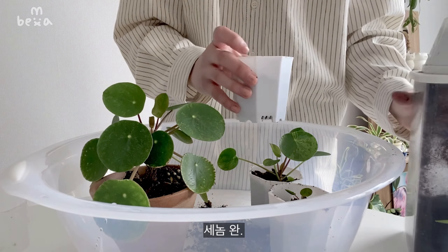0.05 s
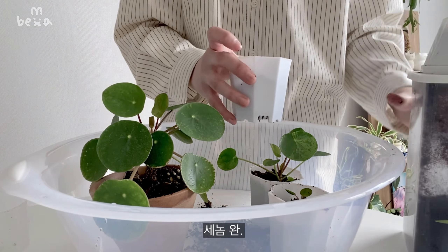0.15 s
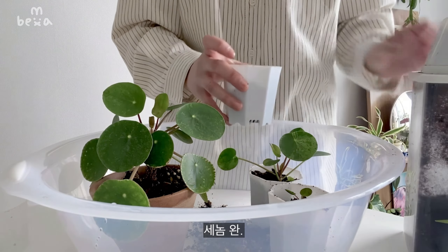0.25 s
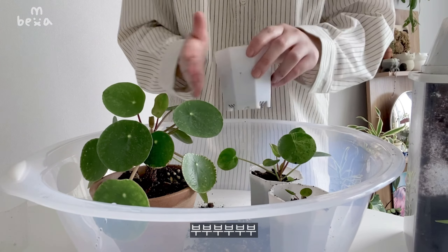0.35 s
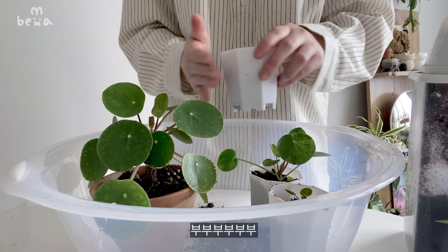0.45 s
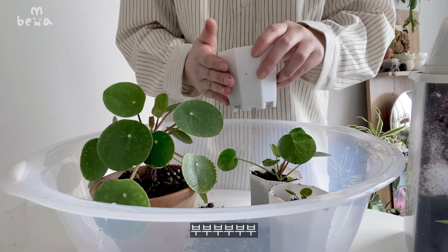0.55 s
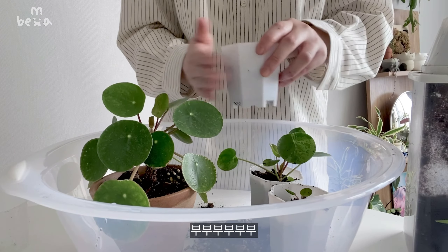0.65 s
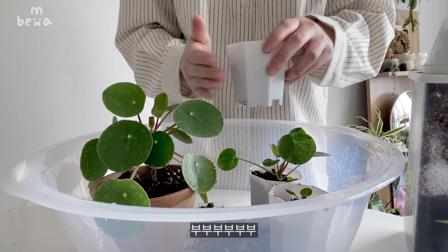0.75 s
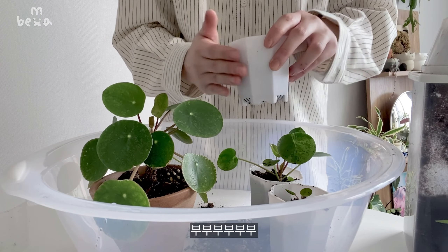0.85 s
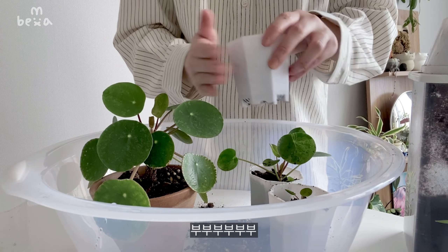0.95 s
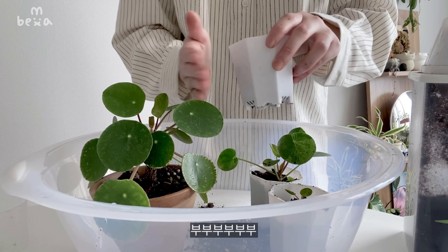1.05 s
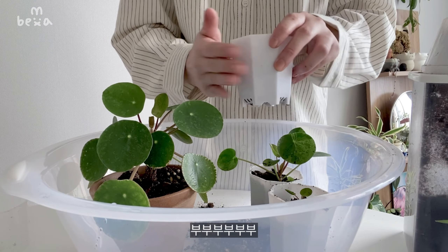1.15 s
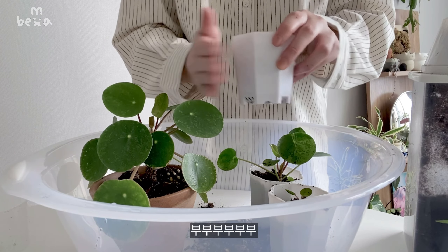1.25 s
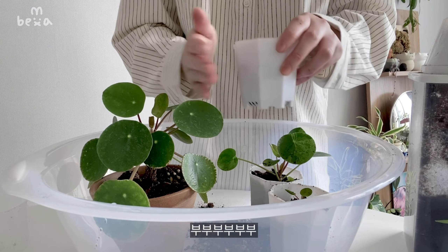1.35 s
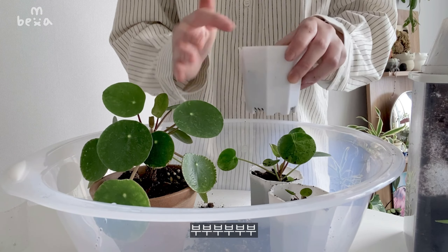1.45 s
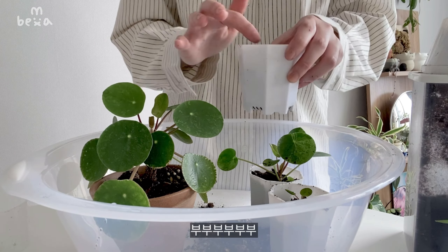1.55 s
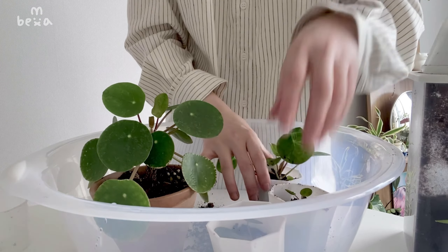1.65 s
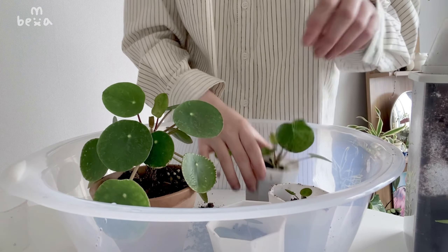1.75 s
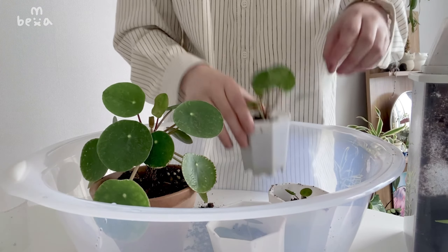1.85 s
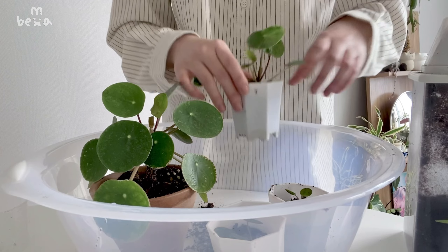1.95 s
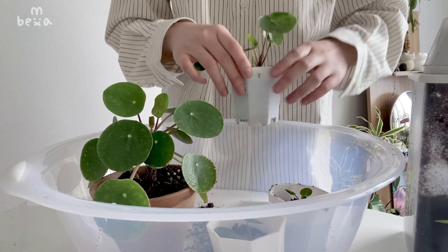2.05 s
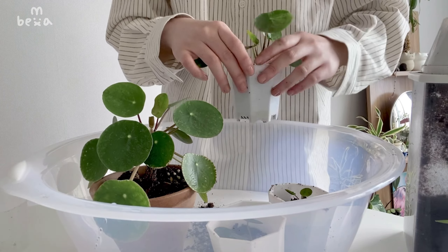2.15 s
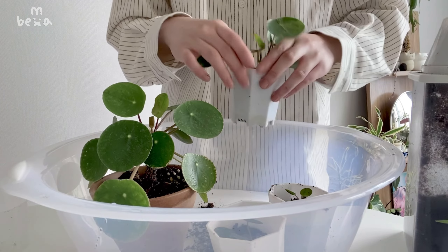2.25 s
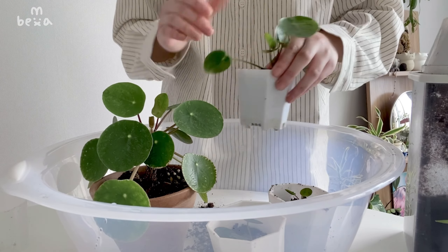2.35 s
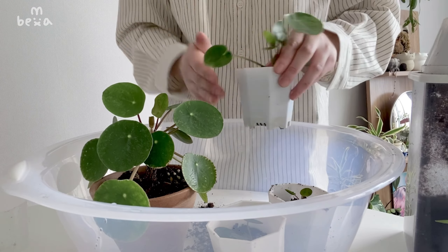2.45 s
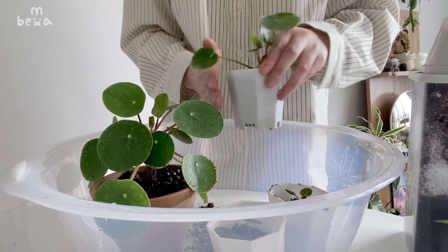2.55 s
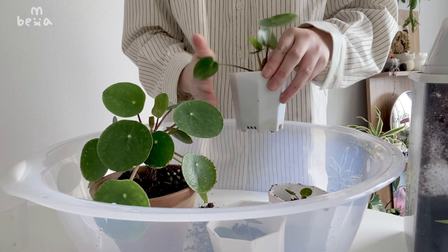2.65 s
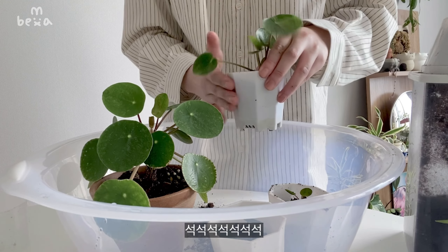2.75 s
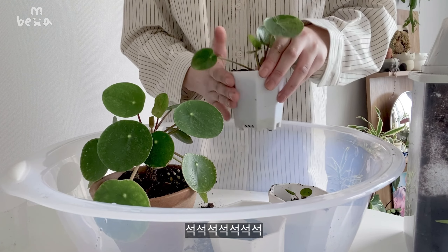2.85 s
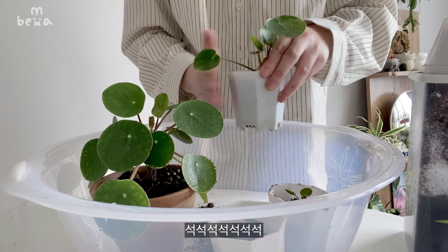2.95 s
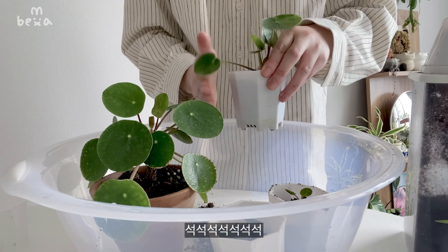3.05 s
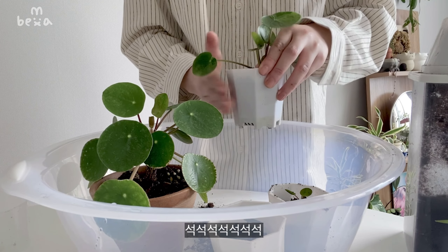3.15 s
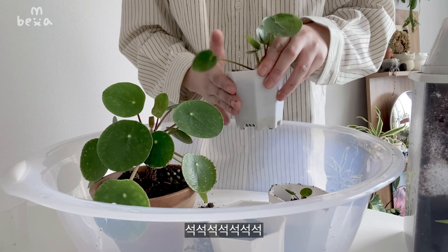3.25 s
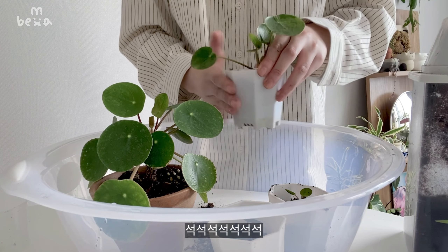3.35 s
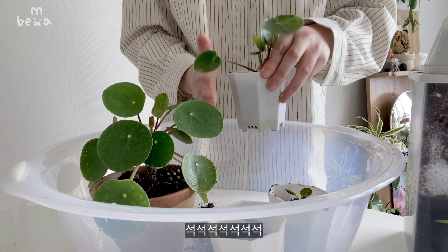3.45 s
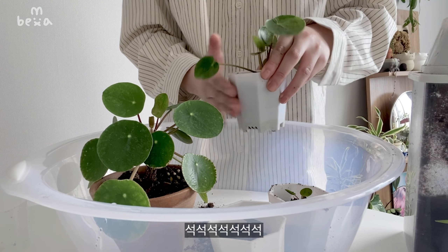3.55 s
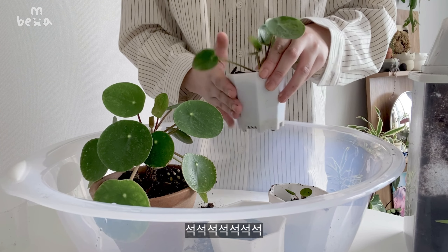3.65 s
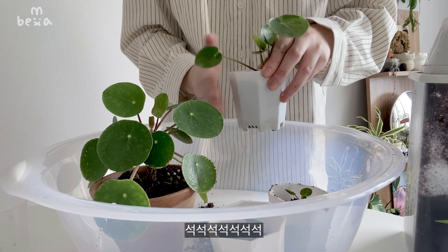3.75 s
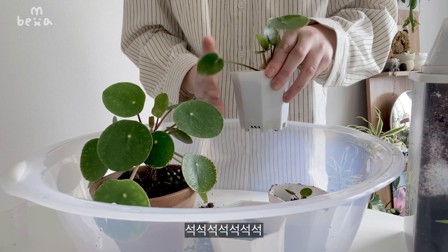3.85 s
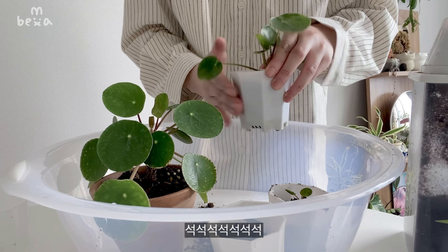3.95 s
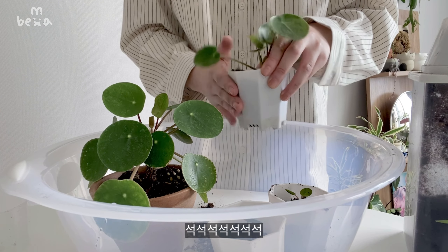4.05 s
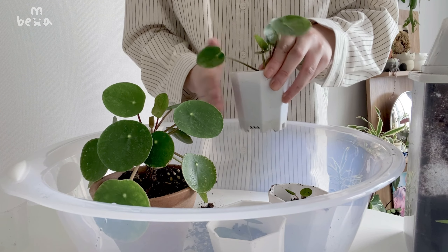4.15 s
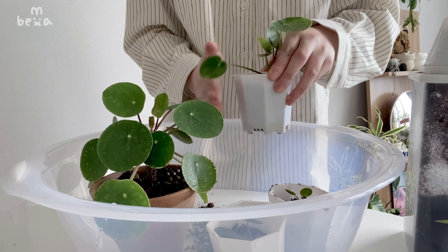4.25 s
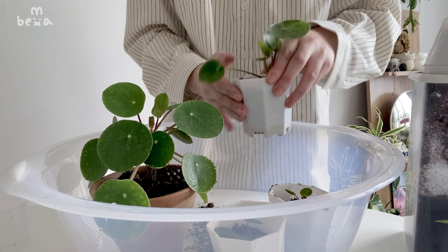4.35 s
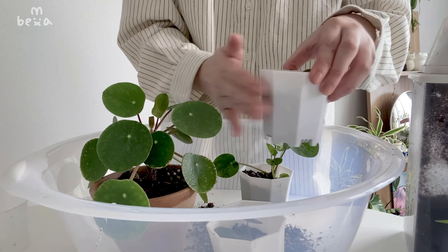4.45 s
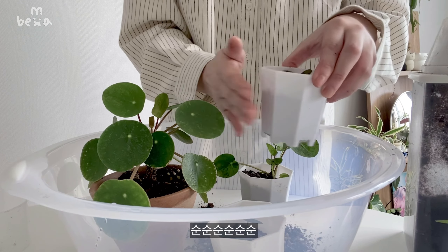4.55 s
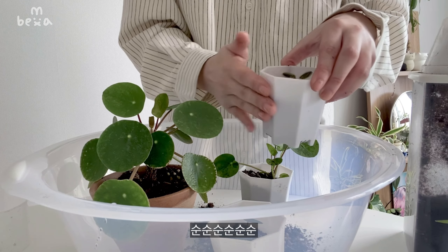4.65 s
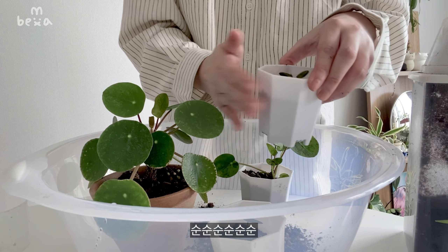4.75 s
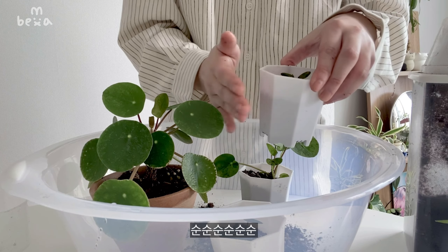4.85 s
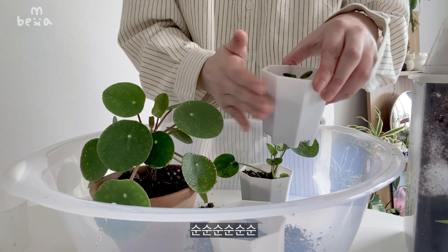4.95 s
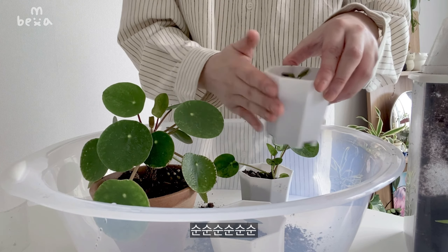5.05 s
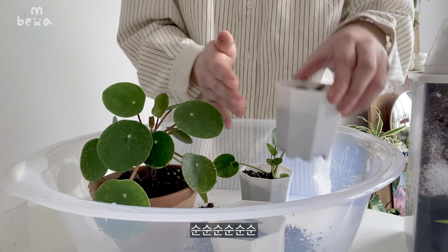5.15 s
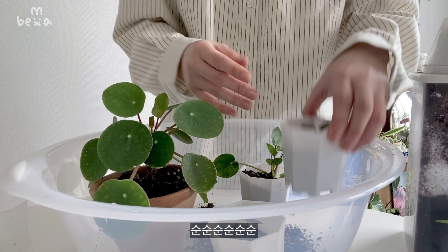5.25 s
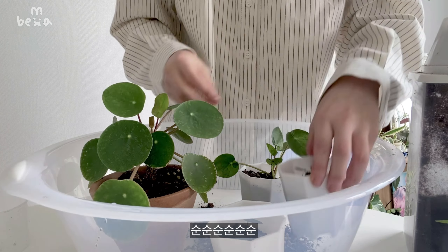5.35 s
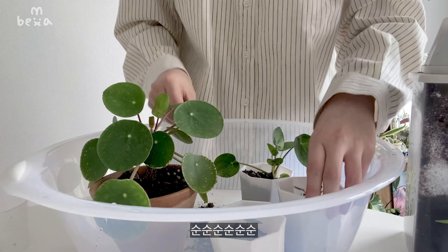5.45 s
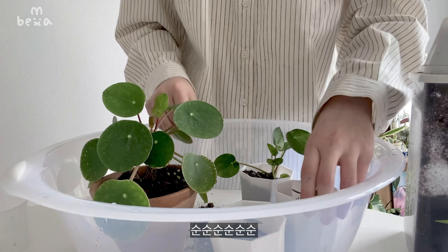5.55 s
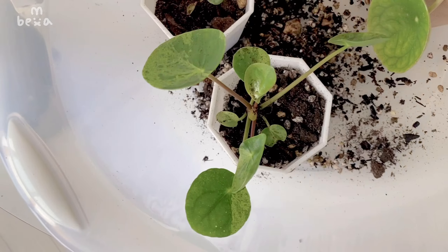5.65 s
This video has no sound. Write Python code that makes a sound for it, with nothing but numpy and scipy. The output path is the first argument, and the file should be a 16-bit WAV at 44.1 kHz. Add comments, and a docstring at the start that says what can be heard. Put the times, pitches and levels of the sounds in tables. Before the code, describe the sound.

Quick, crackly hand pats on thin plastic plant pots, with dry soil rustling inside, between a few hollow knocks in a small room.

```python
"""A palm pats three small plastic plant pots in turn, about seven times a second, to settle dry soil.
Each pat crackles on the thin wall, knocks on the air inside, thumps the filling and shakes loose crumbs.
First come hollow plastic knocks and a short scrape as something is set down; at the end the last pot
lands in a big plastic tub. The small room echoes and has a low hum.
A faint tone wavers near 1.9 kHz, and four times the sound drops out briefly."""
import sys
import numpy as np
from scipy import signal
from scipy.fft import rfft, irfft, next_fast_len
from scipy.io import wavfile
from scipy.ndimage import uniform_filter1d

SR = 44100
rng = np.random.default_rng(int(sys.argv[2]) if len(sys.argv) > 2 else 0)


def store_pcm(level_fs):
    """Save levels as 16-bit WAV."""
    pcm = np.round(np.clip(level_fs, -1, 1) * 32767).astype(np.int16)
    wavfile.write(sys.argv[1], SR, np.atleast_2d(pcm).T)


N = 250558
TIME = np.arange(N) / SR


def gain(db):
    """Turn decibels into a number to multiply by."""
    return 10 ** (np.asarray(db) / 20)


def normalise(x):
    """Scale a sound so its average strength (rms) is 1."""
    return x / np.sqrt(np.mean(x ** 2))


def lookup(hz, points):
    """Read between (pitch_hz, value) points, with octaves evenly spaced."""
    pitches, values = np.transpose(points)
    return np.interp(np.log(hz + 1), np.log(pitches), values)


def colour(x, points):
    """Turn the lows and highs of a sound up or down along (pitch_hz, level_db) points."""
    size = x.shape[-1]
    padded = next_fast_len(size + size // 20, True)
    gains = gain(lookup(np.fft.rfftfreq(padded, 1 / SR), points))
    return irfft(rfft(x, padded) * gains, padded)[..., :size]


def add(track, start_s, sound):
    """Mix a sound into a track at a given time."""
    i = max(int(start_s * SR), 0)
    track[..., i:i + sound.shape[-1]] += sound[..., :N - i]


def convolve(x, response):
    """Make a sound ring or echo the way `response` does after a click."""
    return signal.fftconvolve(np.atleast_2d(x), np.atleast_2d(response), axes=1)[:, :N]


def stereo(x, left_lead_s, left_louder_db):
    """Place a sound: it is earlier and louder on the left; negative values favour the right."""
    ahead = np.clip(np.arange(N) + round(left_lead_s * SR), 0, N - 1)
    return np.array([x[ahead] * gain(left_louder_db / 2), x * gain(-left_louder_db / 2)])


def grains(size, spread_db):
    """A stream of tiny clicks; more spread makes a few stand out more."""
    strength = np.minimum(rng.exponential(size=size), 5)
    return normalise(rng.standard_normal(size) * gain(spread_db * strength))


def wander(rate_hz):
    """A random drift of about 1 either way that picks a new target at the given rate."""
    step = int(SR / rate_hz)
    targets = np.repeat(rng.standard_normal(N // step + 1), step)
    return normalise(uniform_filter1d(targets, step)[:N])


def ring(tones, pitch_factor=1, size=8192):
    """The fading tones an object gives after a click; a wider tone dies sooner."""
    t, sound = TIME[:size], np.zeros(size)
    for k, (hz, width_hz, db) in enumerate(tones):
        fade = gain(db) * width_hz * np.exp(-np.pi * width_hz * t)
        sound += (-1) ** k * fade * np.sin(2 * np.pi * hz * pitch_factor * t)
    return sound / np.linalg.norm(sound)


def burst(response, contact_s, spread_db, size=2048):
    """One touch is many tiny contacts, and each sets the plastic ringing."""
    age = TIME[:size] / max(contact_s, 1e-4)
    press = age ** 1.28 * np.exp(-1.15 * age)  # the contact grows, then settles
    sound = signal.fftconvolve(grains(size, spread_db) * press, response[:size])[:size]
    return sound / np.linalg.norm(sound)


def blows(rows, tones, size=8192):
    """Short, smooth pushes on something that rings; a longer push sounds duller."""
    track, response = np.zeros(N), ring(tones)
    for start_s, db, push_s in rows:
        push = np.sin(np.pi * np.minimum(TIME[:size] / push_s, 1))
        knock = signal.fftconvolve(push, response)[:size]
        add(track, start_s, gain(db) * knock / np.abs(knock).max())
    return track


# Hollow plastic knocks: start_s, level_db, push_s
PLASTIC_KNOCKS = [(0.0005, -29.5, 0.002), (0.017, -49.5, 0.0033), (0.046, -37.5, 0.0044),
                  (0.1185, -24.5, 0.0012), (0.1235, -29, 0.0066), (0.1302, -18.5, 0.00027),
                  (0.1365, -27, 0.00057), (0.159, -36.5, 0.00028), (0.193, -37, 0.00087),
                  (0.297, -47, 0.0014)]
# Tones of the hollow plastic: pitch_hz, width_hz, level_db
PLASTIC_TONES = [(117, 26.5, -5), (198, 47, 0.5), (324, 65, -0.5), (388, 54, 3), (590, 41, 1.5),
                 (647, 84, -1.5), (804, 207, 0), (902, 120, -3.5), (1120, 120, -10), (1500, 520, -26)]
# How the short scrape rises and falls: time_s, level_db
SCRAPE_LEVELS = [(0.0, -22.5), (0.106, -46), (0.12, -34.5), (0.134, -33), (0.168, -61), (0.25, -49),
                 (0.314, -91.5), (0.35, -72)]
def knocks_and_scrape():
    """Hollow plastic rings with a few knocks and a short scrape as something is set down."""
    scrape_db = np.interp(TIME, *np.transpose(SCRAPE_LEVELS))
    friction = grains(N, 2.7) * gain(scrape_db) * (TIME < SCRAPE_LEVELS[-1][0])
    rasp = colour(friction, [(20, -22.5), (60, -14.5), (120, -5.5), (300, 3.5), (900, -8),
                             (1500, -6.5), (2600, -23.5), (4000, -37.5), (12000, -51)])
    scrape = gain(-15.5) * convolve(friction, ring(PLASTIC_TONES))[0] + gain(5) * rasp
    return stereo(blows(PLASTIC_KNOCKS, PLASTIC_TONES) + scrape, -0.00027, 4.5)


# Time the echo takes to fade by 60 dB: pitch_hz, fade_s
ECHO_FADES = [(100, 0.5), (400, 0.6), (1200, 0.5), (3000, 0.55), (7000, 0.33), (14000, 0.67)]
# Lows and highs of the echo: pitch_hz, level_db
ECHO_COLOUR = [(60, 8), (300, -0.5), (700, -3), (1300, -4), (2800, -2.5), (5000, -8), (9000, -4.5),
               (10500, -21.5), (13000, -9.5), (16000, -18.5)]
def room_echo(size=32768):
    """A small room's answer to a click: many reflections, each pitch range fading at its own speed."""
    t, hz = TIME[:size], np.fft.rfftfreq(size, 1 / SR)
    noise = rfft(rng.standard_normal((2, size)))
    alike = 1 / (1 + (hz / 330) ** 2)  # long waves reach left and right alike
    noise[1] = alike * noise[0] + np.sqrt(1 - alike ** 2) * noise[1]
    echo = 0
    for centre_hz, fade_s in ECHO_FADES:
        band = lookup(hz, [(f, float(f == centre_hz)) for f, _ in ECHO_FADES])
        echo = echo + irfft(noise * band) * np.exp(-np.log(1000) * t / fade_s)
    early_boost = 1 + 1.4 * np.exp(-t / 0.025)
    onset = np.clip(t / 0.00087 - 0.5, 0, 1)
    return colour(echo / np.linalg.norm(echo[0]), ECHO_COLOUR) * early_boost * onset


# Lows and highs of the room's air noise: pitch_hz, level_db
AIR_COLOUR = [(20, -27.5), (45, -12.5), (68, -2), (90, -8), (120, -20), (200, -17.5), (400, -30),
              (850, -26), (1400, -37.5), (1800, -37.5), (2300, -46.5), (5000, -51.5), (15000, -60.5)]
def room_tone():
    """Dull air noise and a wavering low hum."""
    middle, side = (normalise(colour(rng.standard_normal(N), AIR_COLOUR)) for _ in range(2))
    side = colour(side, [(70, -8), (250, -4.5), (700, 3.5), (3000, 0)])
    air = np.array([middle + side, middle - side]) * gain(-67.5 + 1.1 * wander(8))
    hum_hz = 71.2 + 6 * wander(9)
    hum = np.sin(2 * np.pi * np.cumsum(hum_hz) / SR) * gain(-61.5 + 3 * wander(8.7))
    return air + stereo(hum, 0, 4.6)


def faint_tone():
    """A faint tone near 1.9 kHz wavers in pitch and level."""
    pitch_hz = 1868 + 18 * wander(60)
    tone = np.sin(2 * np.pi * np.cumsum(pitch_hz) / SR) * gain(-94 + 6 * wander(25))
    return stereo(tone, 0, 4.6)


# Fingers shifting their grip: peak_s, level_db
FINGER_RUBS = [(0.28, -72.5), (0.463, -63), (0.505, -72), (0.575, -69.5), (0.64, -54), (0.79, -58),
               (0.918, -57), (1.058, -50), (1.36, -51), (1.82, -74.5), (2.199, -78.5), (2.3, -77),
               (2.63, -62.5), (5.24, -76.5)]
# Crumbs and fingertips ticking on the wall: start_s, level_db
WALL_TICKS = [(0.493, -44), (0.6311, -44), (0.636, -31.5), (0.6518, -41.5), (1.061, -32.5), (1.0886, -31.5),
              (1.352, -38), (1.3618, -31.5), (2.6217, -39), (2.6646, -44), (4.5586, -46), (4.6071, -46.5),
              (5.266, -54)]
# Lows and highs of loose soil, also used for rubs and ticks: pitch_hz, level_db
SOIL_COLOUR = [(200, -29), (700, -9.5), (1800, -6), (3000, 2.5), (4500, 1.5), (8500, -5), (10500, -12),
               (13000, -8), (16000, -26)]
def fingers(rise_db_per_s=599.5, fall_db_per_s=451):
    """Skin creeps over the pot, and single crumbs and fingertips tick against it."""
    ticks, grip = np.zeros((2, N))
    for start_s, db in WALL_TICKS:
        add(ticks, start_s, gain(db + 12.5) * burst(np.ones(1), contact_s=0.00057, spread_db=12))
    for peak_s, db in FINGER_RUBS:
        swell_db = np.minimum(rise_db_per_s * (TIME - peak_s), fall_db_per_s * (peak_s - TIME))
        grip += gain(db + swell_db)
    rub = grains(N, 4.4) * grip * gain(wander(70))
    return stereo(gain(2) * colour(ticks + rub, SOIL_COLOUR), 0.00014, 0.5)


# Main tones of the thin pot wall: pitch_hz, width_hz, level_db
WALL_TONES = [(2320, 180, -2.5), (3325, 617, 6), (4130, 770, 1)]
# The wall's higher, short-lived tones: pitch_hz, width_hz, level_db
SNAP_TONES = [(4720, 1404, 1.5), (6240, 860, 3.5), (8720, 1640, -2), (12830, 330, -3), (14200, 1500, -9.5)]
def wall_crackle(wall_db, snap_db, pitch_factor, touch_s, softness):
    """The thin wall snaps and rings; the grip stiffens it a little differently at every pat."""
    pitch_factor *= np.exp(0.04 * rng.standard_normal())
    snap = burst(ring(SNAP_TONES, pitch_factor), touch_s, spread_db=6)
    wall = burst(ring(WALL_TONES, pitch_factor), 1.65 * touch_s, spread_db=2.3)
    return gain(snap_db + 15) * np.sqrt(softness) * snap + gain(wall_db + 27) * wall


# Tones of the air and soil inside the pot: pitch_hz, width_hz, level_db
HOLLOW_TONES = [(1257, 170, 22), (1570, 900, -17)]
def hollow_knock(knock_db, pitch_factor, touch_s, softness):
    """A pat dents the wall and pumps the air inside; a firm pat does so more."""
    knock = burst(ring(HOLLOW_TONES, pitch_factor), 0.88 * touch_s, spread_db=1.9)
    return gain(knock_db + 24) / np.sqrt(softness) * knock


def soil_slide(level_db, softness, size=8192):
    """Fine soil hisses as it slides back after a pat; a few coarse crumbs stand out."""
    t, crumbs_per_s = TIME[:size], 160
    slide = (1 - np.exp(-t / 0.0028)) * np.exp(-t / 0.045)
    crumbs = (rng.random(size) < crumbs_per_s / SR) * rng.standard_normal(size)
    return gain(level_db - 14.5) * softness * slide * (grains(size, 5.1) + gain(19) * crumbs)


# The three pots: from_s, wall_pitch_factor, hollow_pitch_factor, contact_s, rustle_db (added to wall_db)
PLANT_POTS = [(0, 0.89, 0.95, .0012, 11.5), (2.0, 0.93, 1.007, 0.0012, 6.5), (4.5, 0.93, 1.2, 0.001, 4.5)]
# The pats (a flat palm snaps, a cushioned one hardly does): start_s, wall_db, snap_db, knock_db
PALM_PATS = [(0.603, -57.5, -51, -53), (0.7454, -58, -31, -50), (0.8925, -46, -33.5, -48),
             (1.022, -51.5, -45, -49.5), (1.1765, -41.5, -26.5, -47), (1.3294, -57, -45.5, -50),
             (2.7604, -45.5, -37, -50), (2.8887, -49.5, -33, -55), (3.018, -45.5, -42.5, -47.5),
             (3.1514, -46, -43, -47.5), (3.285, -48.5, -38.5, -47), (3.4152, -47, -47, -50.5),
             (3.5482, -47.5, -49, -49), (3.681, -42.5, -30.5, -45), (3.8171, -43.5, -29, -41.5),
             (3.9539, -47.5, -39.5, -55), (4.0913, -42.5, -26.5, -41.5), (4.2317, -50.5, -34.5, -57),
             (4.3566, -51, -35, -54), (4.5373, -61.5, -48.5, -59), (4.681, -49.5, -33.5, -65.5),
             (4.822, -52.5, -34.5, -54.5), (4.9676, -45, -36, -56.5), (5.0989, -46, -28, -45.5)]
def pot_face():
    """What one side of the pot gives off at each pat: a crackle, a knock and sliding soil."""
    shell, soil = np.zeros((2, N))
    for start_s, wall_db, snap_db, knock_db in PALM_PATS:
        pot_in_hand = [pot for from_s, *pot in PLANT_POTS if from_s <= start_s][-1]
        wall_pitch, hollow_pitch, contact_s, rustle_db = pot_in_hand
        softness = gain(-0.35 * (snap_db + 31))
        touch_s = contact_s * softness  # a gentle pat touches for longer
        add(shell, start_s, wall_crackle(wall_db, snap_db, wall_pitch, touch_s, softness))
        add(shell, start_s, hollow_knock(knock_db, hollow_pitch, touch_s, softness))
        add(soil, start_s, soil_slide(wall_db + rustle_db, softness))
    return shell + colour(soil, SOIL_COLOUR)


def thump(start_hz, end_hz, fall_s, decay_s, size=4096):
    """The hand adds its weight to the pot as it lands, so the thump falls in pitch."""
    t = TIME[:size]
    hz = end_hz + (start_hz - end_hz) * np.exp(-t / fall_s)
    sound = np.sin(2 * np.pi * np.cumsum(hz) / SR) * t * np.exp(-t / decay_s)
    return sound / np.linalg.norm(sound)


# Soft bumps of the fingers taking hold of a pot: start_s, level_db
GRIP_BUMPS = [(1.742, -75.5), (1.802, -55), (1.897, -65), (2.322, -58), (2.624, -68.5)]
def thuds(typical_knock_db=-50, typical_snap_db=-36):
    """The heavy, soil-filled pot answers each pat and each new grip with a dull thud."""
    track = np.zeros(N)
    for start_s, _, snap_db, knock_db in PALM_PATS:
        start_hz = 740 * np.exp(0.14 * rng.standard_normal())
        decay_s = 0.0046 * gain(-0.34 * (snap_db - typical_snap_db))  # shorter under a flat palm
        # the soil cushions the pat, so the thud grows more slowly than the knock
        level_db = -27.5 + 0.46 * (knock_db - typical_knock_db)
        add(track, start_s, gain(level_db) * thump(start_hz, 33, fall_s=0.0044, decay_s=decay_s))
    for start_s, db in GRIP_BUMPS:
        add(track, start_s, gain(db + 19.5) * thump(470, 70, fall_s=0.011, decay_s=0.0091))
    return stereo(track, -0.00012, 2.3)


# The room's lowest tone: pitch_hz, width_hz, level_db
BOOM_TONE = [(70.4, 4.7, 0)]
def room_boom(thudding):
    """Each thud sets the room's lowest tone booming."""
    return gain(-20) * convolve(thudding, ring(BOOM_TONE))


# The pot landing on the tub floor: start_s, level_db, push_s
LANDING_BLOWS = [(5.5303, -24.5, 0.0005), (5.5324, -20.5, 0.0015)]
# Tones of the tub floor under the pot: pitch_hz, width_hz, level_db
FLOOR_TONES = [(334, 172, -4), (494, 160, -6.5), (847, 310, -16.5), (1440, 260, -15), (1705, 110, -4)]
def pot_landing(settle_s=0.039):
    """The pot's foot clicks on the tub floor, its weight makes the floor knock, and the soil settles."""
    click, soil = np.zeros((2, N))
    start_s, t = LANDING_BLOWS[0][0], TIME[:8192]
    foot = ring([(1670, 1400, -2), (3790, 2200, -7.4)])
    add(click, start_s, gain(-20) * burst(foot, contact_s=0.00075, spread_db=2.6))
    add(soil, start_s, gain(-65.5) * np.exp(-t / settle_s) * grains(len(t), 3.3))
    # the landing knock carries little deep bass
    thin_bass = [(30, -25.5), (120, -9.5), (280, 0.5), (4000, 6), (9000, -0.5)]
    knock = colour(blows(LANDING_BLOWS, FLOOR_TONES), thin_bass)
    return stereo(gain(-3) * knock + click + colour(soil, SOIL_COLOUR), 0.00019, -1.5)


def scene():
    """The knocks, pats and landing, heard directly and as echoes in the room."""
    # each side of the pot crackles in its own way and faces a different part of the room
    faces = np.array([pot_face() for _ in range(4)])
    pat_echoes = sum(convolve(gain(-11) * face, room_echo()) for face in faces)
    pats = gain(-2.5) * stereo(faces[0], 0.00014, 3.2) + gain(-4) * faces[1:3]
    rubbing, thudding, knocks, landing = fingers(), thuds(), knocks_and_scrape(), pot_landing()
    direct = knocks + rubbing + pats + thudding + landing
    into_room = gain(-8.5) * knocks + gain(-1) * rubbing + gain(-2.5) * thudding + gain(-11.5) * landing
    other_echoes = convolve(into_room[1], room_echo())
    return direct + pat_echoes + other_echoes + room_boom(thudding) + room_tone() + faint_tone()


# Moments when the sound drops out: start_s, end_s
GAPS = [(0.36, 0.432), (1.618, 1.688), (4.425, 4.508), (5.609, 5.655)]
def record(dry, fade_out_s=0.02, fade_in_s=0.035, top_hz=15500):
    """The sound drops out four times and fades back in; the very highest treble is cut."""
    volume = np.ones(N)
    for start_s, end_s in GAPS:
        fade = np.maximum((start_s - TIME) / fade_out_s, (TIME - end_s) / fade_in_s)
        volume *= np.clip(fade, 0.01, 1)
    treble_cut = signal.ellip(8, 0.2, 70, top_hz, fs=SR, output="sos")
    return signal.sosfilt(treble_cut, dry * volume)


dry = scene()
out = record(dry)
store_pcm(out)
```